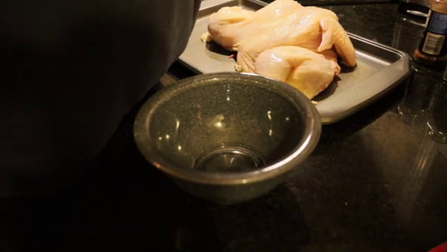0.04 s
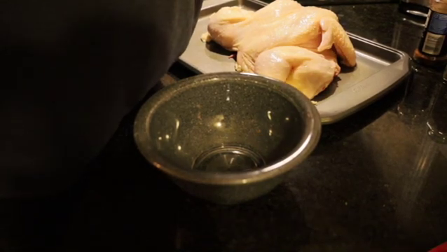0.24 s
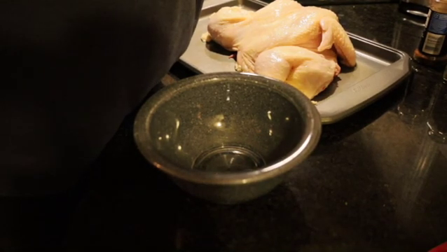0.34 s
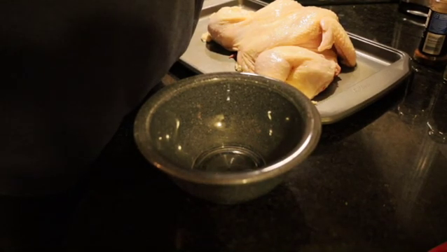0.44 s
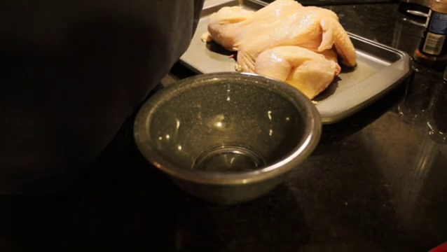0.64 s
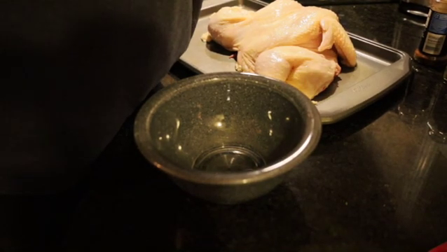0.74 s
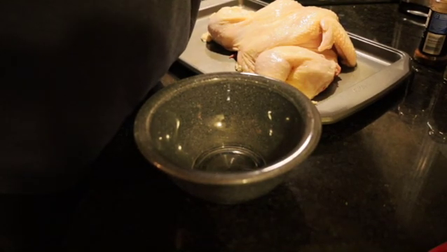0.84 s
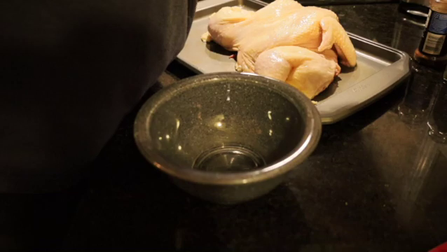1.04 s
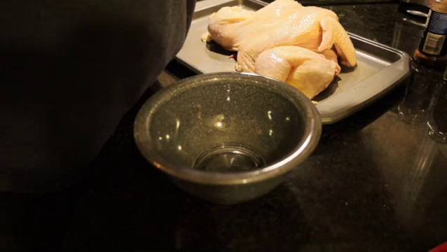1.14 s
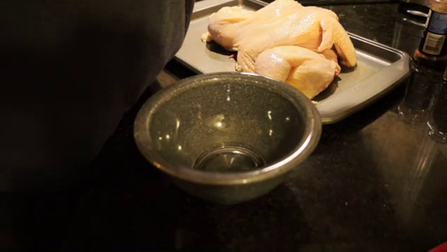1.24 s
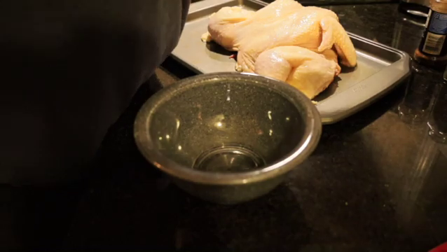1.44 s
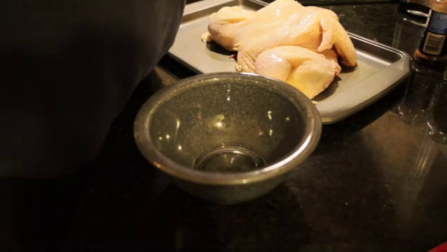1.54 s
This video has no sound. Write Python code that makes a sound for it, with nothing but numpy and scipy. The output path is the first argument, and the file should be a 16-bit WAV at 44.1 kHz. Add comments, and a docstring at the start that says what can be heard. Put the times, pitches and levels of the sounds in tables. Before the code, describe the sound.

Sugar crunching under a scoop in a small kitchen, with a sharp knock and faint taps.

```python
"""In a small kitchen, a scoop is pushed three times through brown sugar.
Grains crunch against it, lumps snap, and it squeaks faintly along the container's wall.
Early on it knocks hard, bounces and rings. A few light taps of handled utensils follow.
Soft bumps, a short room echo and quiet room air lie underneath."""
import sys
import numpy as np
from scipy import signal
from scipy.fft import rfft, irfft
from scipy.io import wavfile

SR = 44100
rng = np.random.default_rng(int(sys.argv[2]) if len(sys.argv) > 2 else 0)


def wav_record(signal):
    """Record a signal, one row per channel, as 16-bit PCM in the file named by sys.argv[1]."""
    frames = np.transpose(np.atleast_2d(signal))
    bounded = np.clip(frames, -1, 1)
    # unit amplitude maps onto the largest positive 16-bit level
    quanta = np.round(bounded * 32767).astype(np.int16)
    wavfile.write(sys.argv[1], SR, quanta)


N = 70560
T = np.arange(N) / SR

# three pushes through the sugar: time_s, crunch_db, hollow_db, fizz_db
FIRST_PUSH = [(.061, -67, -84, -96), (.069, -57, -55.5, -83), (.09, -50.5, -51, -58),
              (.108, -45.5, -54, -56), (.135, -52.5, -56, -60.5), (.15, -49.5, -67, -61.5),
              (.175, -50, -68, -65.5), (.192, -46.5, -57, -63), (.21, -50, -64, -63), (.23, -48, -54, -60)]
SECOND_PUSH = [(0.431, -67, -66.5, -92), (.468, -57, -74.5, -87), (.515, -42.5, -56.5, -59),
               (.533, -52, -63, -68), (.555, -57, -63, -84), (.58, -72, -78, -96)]
THIRD_PUSH = [(0.586, -75, -73, -99), (.632, -59, -75, -90), (0.652, -45, -50.5, -71),
              (.69, -49, -60, -70.5), (.755, -47.5, -62, -66), (.79, -48.5, -53.5, -55.5),
              (.86, -47, -64, -66), (.94, -54, -62, -67.5), (.985, -47.5, -60, -71),
              (1.025, -53.5, -66, -71), (1.053, -50, -60.5, -76), (1.129, -54, -70.5, -79),
              (1.165, -62, -71, -78.5), (1.205, -69.5, -70.5, -82), (1.225, -67.5, -73.5, -76.5),
              (1.273, -63, -63, -71), (1.305, -72.5, -89, -88)]
# how deep the scoop sits: time_s, depth_0_to_1
SCOOP_DEPTH = [(.2, 1), (.48, 0.53), (.62, 0.27), (.65, 1), (.71, 0.72), (.84, 0.46), (1.0, 0.35),
               (1.13, 0.9), (1.25, 1)]
# tone of the grains, from low to high: pitch_hz, level_db
DEEP_CRUNCH_TONE = [(900, -33.5), (1400, -11.5), (1950, 3), (2300, -2.5), (2800, -3), (3450, 4),
                    (4200, -2.5), (4800, -5), (6000, -9.5), (8000, -27.5), (11000, -58)]
SHALLOW_CRUNCH_TONE = [(900, -48.5), (1400, -23.5), (2000, -15.5), (2400, -2), (2800, -8), (3400, 3.5),
                       (4150, -5), (4700, -3.5), (6000, -17), (8000, -19.5), (11000, -62)]
HOLLOW_TONE = [(50, -12), (160, -11), (310, -1.5), (470, -6.5), (680, 1.5), (840, 5), (1020, -4),
               (1400, -8), (2500, -54.5)]
FIZZ_TONE = [(5000, -4.5), (8000, 4.5), (10000, -4.5), (13000, -3), (16000, -11)]
# lumps breaking: start_s, level_db, pitch_hz, length_s, crack_vs_snap_db
LUMP_SNAPS = [(0.065, -38, 3370, 0.0055, -33), (0.081, -32.5, 2154, 0.0011, -36),
              (0.101, -24, 2310, 0.0017, -18.5), (0.1423, -34, 3520, 0.0027, -25),
              (0.147, -36.5, 3620, 0.0032, -9), (0.184, -35.5, 3830, 0.01, -20),
              (0.257, -28, 6850, 0.0015, -24), (0.298, -33.5, 5960, 0.0034, -35),
              (0.307, -36, 6260, 0.0038, -27), (0.334, -42.5, 5800, 0.0035, -29),
              (0.498, -35, 3700, 0.0034, -17), (0.511, -34, 3940, 0.0011, -20),
              (0.592, -45.5, 3820, 0.0026, -45), (0.6376, -29, 3070, 0.00096, -38),
              (0.6457, -27, 2500, 0.0006, -40), (.6505, -33.5, 3200, 0.0028, -37),
              (0.6678, -34, 3230, 0.0013, -30), (0.7046, -28, 2660, 0.0019, -33),
              (0.8375, -29.5, 3580, 0.0022, -39), (0.847, -34, 3500, 0.0022, -34),
              (0.9165, -26, 3340, .0035, -15), (1.043, -38, 2250, 0.0075, -32),
              (1.069, -31.5, 4080, 0.0022, -28), (1.125, -42.5, 1870, 0.0074, -27)]
# tone around a snap's own pitch: pitch_ratio, level_db
LUMP_TONE = [(.1, -32), (.45, -25), (.75, -5.5), (1, 5), (1.25, -6.5), (1.9, -22), (3.2, -50)]
# the scoop knocks and bounces: start_s, level_db, thud_vs_clack_db, length_s
SCOOP_KNOCKS = [(0.2338, -10.5, 10, 0.0011), (0.236, -7, -0.5, 0.0068), (0.24, -12, -2.5, 0.0045),
                (0.245, 1.5, -15.5, 0.0038), (0.2501, -12, -0.5, 0.0033), (0.254, -7.5, -6.5, 0.0044),
                (0.2632, -3.5, 0, 0.017), (.273, -7, -1, 0.0072), (0.303, -18, -2, 0.0099)]
# tone of a lump's crack, a knock's clack and thud, and a tap's tick: pitch_hz, level_db
CRACK_TONE = [(2000, -33), (6000, -2), (8300, 7), (11500, -1.5), (15000, -8.5)]
CLACK_TONE = [(600, -29.5), (1300, -16.5), (2050, 5), (2500, -4), (3200, 3), (3800, -5.5), (4600, -7),
              (5300, -16), (7500, -19.5), (10000, -32.5), (15000, -37.5)]
THUD_TONE = [(50, -45), (110, -18), (300, -6.5), (600, -9), (860, 3), (1250, 3.5), (1650, 1.5), (2500, 1),
             (6000, -58)]
TICK_TONE = [(100, -35), (400, 4), (1200, -3.5), (3000, 12), (4500, -7), (7000, -26), (15000, -29)]
# notes that struck things ring with (ring_s is the time to fade by 60 dB): pitch_hz, level_db, ring_s
SCOOP_NOTES = [(841, -8, 0.2), (912, -6.5, 0.17), (1587, -9, 0.16), (1654, -2, 0.17), (1941, -7, .2),
               (2046, 6.5, 0.2), (2119, -3.5, 0.15), (2230, -8, 0.16), (2250, -10, .18), (2313, -3.5, .17),
               (2586, -3, 0.16), (3260, -10.5, 0.16), (4555, 3, 0.23)]
UTENSIL_NOTES = [(506, -17, 0.027), (950, -16, 0.035), (2135, -1, 0.033), (3280, 3.5, 0.0077),
                 (4110, -5, 0.018), (4470, -10, 0.018), (5430, -7.5, 0.023), (9700, -22.5, 0.0047),
                 (11400, -28, 0.011)]
# the scoop rubs the wall: start_s, length_s, level_db
WALL_RUBS = [(0.606, .03, -58), (0.883, 0.17, -57), (1.167, 0.013, -65), (1.213, 0.067, -55.5)]
# notes of the rubbed wall: pitch_hz, level_db
WALL_NOTES = [(2390, -2.5), (2640, -4.5), (3180, 3), (3320, 0.5), (3600, -3)]
# light taps: start_s, level_db, pitch_hz, ring_s, second_note_ratio, second_note_db, tick_db
LIGHT_TAPS = [(1.327, -57, 1150, 0.011, 1.6, -8, -12), (1.3526, -50.5, 1927, 0.037, 1.7, -13, -5),
              (1.3961, -55, 2470, 0.027, 1.55, -16, -15), (1.4264, -63.5, 4410, 0.012, 0.79, -1.5, -4),
              (1.4485, -60.5, 7450, 0.02, 1.1, -3.5, -12), (1.463, -64, 7550, 0.022, 0.87, -8, -15.5),
              (1.4698, -61.5, 1246, 0.023, 1.9, -2.5, -1)]
# a hard utensil clicks down: start_s, level_db
UTENSIL_CLICKS = [(1.5704, -59.5), (1.572, -42), (1.5736, -48.5), (1.578, -53)]
# soft bumps: peak_s, level_db, pitch_hz, rise_s, fall_s
SOFT_BUMPS = [(.164, -46.5, 745, .003, 0.0034), (.196, -41, 334, 0.0037, .0045),
              (.523, -52.5, 317, 0.0017, 0.0045), (0.9231, -42.5, 850, 0.0014, 0.0027),
              (1.356, -49.5, 358, 0.0018, .012), (1.358, -55.5, 600, 0.0029, .011),
              (1.4706, -48, 497, 0.0015, 0.0016)]
# how long the kitchen echoes: pitch_hz, ring_s
ECHO_TIMES = [(200, 0.37), (1400, 0.21), (3000, 0.32), (5600, 0.26)]
# tone of the room's air: pitch_hz, level_db
AIR_TONE = [(25, -38.5), (60, -23.5), (110, -11.5), (200, -3), (350, -2), (700, -11), (1500, -15.5),
            (3300, -19), (6000, -28), (15000, -42)]


def sugar(fade_s=0.0024):
    """Grains rub past the scoop: a crunch that darkens with depth, a hollow body and a fine fizz."""
    gains = np.zeros((3, N))
    for push in (FIRST_PUSH, SECOND_PUSH, THIRD_PUSH):
        times, *levels = np.transpose(push)
        fade = np.exp(-np.abs(T - np.clip(T, times[0], times[-1])) / fade_s)
        gains += fade * from_db([np.interp(T, times, level) for level in levels])
    crunch_gain, hollow_gain, fizz_gain = gains
    depth = np.interp(T, *np.transpose(SCOOP_DEPTH))
    clicks = crunch_gain * grains_and_crumbs(per_s=6500)
    crunch = colour(clicks * depth, DEEP_CRUNCH_TONE) + colour(clicks * (1 - depth), SHALLOW_CRUNCH_TONE)
    hollow = colour(hollow_gain * grains(per_s=1800), HOLLOW_TONE)
    fizz = colour(fizz_gain * grains_and_crumbs(per_s=4600), FIZZ_TONE)
    return crunch + from_db(-2.5) * hollow + from_db(-3.5) * fizz


def grains(per_s, spread_db=3, clump_db=1.6):
    """Grains click at random and in clumps, many small and a few large."""
    sizes = from_db(spread_db * np.minimum(rng.exponential(1, N), 3)) * rng.choice([-1, 1], N)
    clumps = from_db(clump_db * wander(per_s=150))
    return rms_one(clumps * sizes * (rng.random(N) < per_s / SR))


def grains_and_crumbs(per_s):
    """Among the fine grains, larger crumbs break, each ringing briefly on its own pitch."""
    pitches = np.geomspace(1200, 15000, 48)
    breaks = grains(per_s=1100)
    chosen = rng.integers(0, len(pitches), N)
    crumbs = sum(np.sqrt(hz) * ring(breaks * (chosen == k), hz, ring_s=0.019)
                 for k, hz in enumerate(pitches))
    return rms_one(grains(per_s) + from_db(-7) * rms_one(crumbs))


def lump_snaps(rise_share=0.56):
    """Each lump gives way in a short pitched snap with a fine crack on top."""
    out = 0
    for start, db, hz, length, crack_db in LUMP_SNAPS:
        burst = contact(start, length) * fade_in(start, rise_share * length)
        snap = peak_one(colour(burst, [(hz * ratio, level) for ratio, level in LUMP_TONE]))
        crack = from_db(crack_db) * peak_one(colour(burst, CRACK_TONE))
        out += from_db(db - 3) * (snap + crack)
    return out


def scoop_knocks():
    """The scoop hits and bounces; each hit is a hard clack and a lower thud."""
    clack = sum(from_db(db - 1) * contact(start, length) for start, db, _, length in SCOOP_KNOCKS)
    thud = sum(from_db(db + thud_db - 3) * contact(start, length)
               for start, db, thud_db, length in SCOOP_KNOCKS)
    return colour(clack, CLACK_TONE) + colour(thud, THUD_TONE)


def scoop_ring(twin_gap_hz=21):
    """The first touch rings softly; the hardest hit stops that and starts a ring that swells and dies."""
    first_s = SCOOP_KNOCKS[0][0]
    hardest_s = max(SCOOP_KNOCKS, key=lambda row: row[1])[0]
    swell = fade_in(hardest_s, rise_s=0.0093)
    out = 0
    for start, gain in ((first_s, from_db(-10) * (1 - swell)), (hardest_s, swell)):
        strike = signal.unit_impulse(N, int(start * SR))
        for k, (hz, db, ring_s) in enumerate(SCOOP_NOTES):
            twin = from_db(-15) * ring(strike, hz + twin_gap_hz, ring_s)  # makes the note wobble
            out += (-1) ** k * gain * from_db(db) * (ring(strike, hz, ring_s) - twin)
    return from_db(-28.5) * out


def wall_squeak(release_s=0.0066):
    """The scoop rubs along the wall in tiny slips that set the wall's notes ringing."""
    gain = 0
    for start, length, db in WALL_RUBS:
        fade_out = np.exp(-np.maximum(T - start - length, 0) / release_s)
        gain += from_db(db) * fade_in(start, rise_s=0.006) * fade_out
    slips = grains(per_s=1500)
    squeak = sum((-1) ** k * from_db(db) * ring(slips, hz, ring_s=0.021)
                 for k, (hz, db) in enumerate(WALL_NOTES))
    return gain * rms_one(squeak)


def edge_rasp(start_s=1.08, end_s=1.13):
    """As the scoop comes out, grains skid on its edge with one thin, high note."""
    progress = np.clip((T - start_s) / (end_s - start_s), 0, 1)
    swell = np.sqrt(np.abs(np.sin(np.pi * progress)))
    return from_db(-64) * swell * rms_one(ring(grains(per_s=4600), hz=6930, ring_s=0.01))


def utensil_taps(soften_hz=9000):
    """Each light tap is a soft tick and two notes that die quickly."""
    out = 0
    for start, db, hz, ring_s, ratio, second_db, tick_db in LIGHT_TAPS:
        touch = contact(start, length_s=0.00067)
        note = peak_one(ring(touch, hz, ring_s))
        second_note = from_db(second_db) * peak_one(ring(touch, hz * ratio, ring_s))
        tick = from_db(tick_db) * peak_one(colour(touch, TICK_TONE))
        out += from_db(db) * (note + second_note + tick)
    return signal.sosfilt(signal.butter(4, soften_hz, fs=SR, output="sos"), out)


def utensil_click():
    """A hard utensil lands in a quick run of hits that ring short, hollow notes."""
    hits = sum(from_db(db) * signal.unit_impulse(N, int(start * SR)) for start, db in UTENSIL_CLICKS)
    return sum((-1) ** k * from_db(db) * ring(hits, hz, ring_s)
               for k, (hz, db, ring_s) in enumerate(UTENSIL_NOTES))


def soft_bumps(waver_radians=0.5):
    """A cushioned push swells one low, unsteady note, which dies quickly."""
    out = 0
    for peak_s, db, hz, rise_s, fall_s in SOFT_BUMPS:
        swell = np.exp(-np.maximum(peak_s - T, 0) / rise_s - np.maximum(T - peak_s, 0) / fall_s)
        phase = 2 * np.pi * hz * (T - peak_s) + waver_radians * wander(per_s=260)
        out += from_db(db) * swell * np.sin(phase)
    return out


def kitchen(x, echo_db, build_s=0.0016):
    """Add the room's echo: it builds fast, and each band of pitches dies at its own rate."""
    edges_hz = np.geomspace(60, 16000, 9)
    noise = rng.standard_normal((2, N))
    echo = 0
    for k, (low, high) in enumerate(zip(edges_hz, edges_hz[1:])):
        band = signal.sosfilt(signal.butter(2, [low, high], "band", fs=SR, output="sos"), noise[k % 2])
        echo += band * np.exp(-np.log(1000) * T / at_hz(ECHO_TIMES, np.sqrt(low * high)))
    echo *= 1 - np.exp(-(T / build_s) ** 2)
    return x + from_db(echo_db) * signal.fftconvolve(x, echo / np.linalg.norm(echo))[:N]


def room_air():
    """The room's air is a steady, low hush."""
    return from_db(-72.5) * colour(rng.standard_normal(N), AIR_TONE)


def contact(start_s, length_s, size=4096):
    """A gritty touch: a dying burst of tiny clicks, about equally strong at every pitch."""
    age = np.arange(size) / SR
    burst = rng.standard_normal(size) * np.exp(-age / length_s)
    for _ in range(4):  # even out the tone, then make the burst short again
        spectrum = rfft(burst)
        burst = irfft(spectrum / (np.abs(spectrum) + 1e-12)) * np.exp(-(age / (4 * length_s)) ** 2)
    return np.concatenate([np.zeros(int(start_s * SR)), burst / np.linalg.norm(burst), np.zeros(N)])[:N]


def ring(x, hz, ring_s):
    """Every click in x starts a pure note that fades away."""
    decay = np.exp(-np.log(1000) / (ring_s * SR))
    step = 2 * np.pi * hz / SR
    return signal.lfilter([0, np.sin(step)], [1, -2 * decay * np.cos(step), decay ** 2], x + 1e-18)


def colour(x, tone, size=4096):
    """Give x the balance of low and high pitches in a tone table."""
    cepstrum = irfft(np.log(from_db(at_hz(tone, np.fft.rfftfreq(size, 1 / SR)))))
    cepstrum[1:size // 2] *= 2
    cepstrum[size // 2 + 1:] = 0  # so nothing sounds before the click that causes it
    response = irfft(np.exp(rfft(cepstrum)))
    return signal.fftconvolve(x, response / np.linalg.norm(response))[:N]


def at_hz(table, hz):
    """Read a table between its pitches, with octaves evenly spaced."""
    pitches, values = np.transpose(table)
    return np.interp(np.log(np.maximum(hz, 1)), np.log(pitches), values)


def fade_in(start_s, rise_s):
    """Rise smoothly from 0 towards 1."""
    return 1 - np.exp(-np.maximum(T - start_s, 0) / rise_s)


def wander(per_s):
    """Drift to a new random value per_s times a second."""
    return np.interp(T * per_s, np.arange(N), rng.standard_normal(N))


def from_db(db):
    """Turn decibels into a number to multiply by."""
    return 10 ** (np.asarray(db) / 20)


def rms_one(x):
    """Scale to an average strength (rms) of 1."""
    return x / np.sqrt(np.mean(x ** 2) + 1e-20)


def peak_one(x):
    """Scale to a peak of 1."""
    return x / (np.abs(x).max() + 1e-20)


def scene():
    """Scooping, knocking and handling in the kitchen, over the room's air."""
    air = room_air()
    scooping = kitchen(sugar() + lump_snaps() + wall_squeak() + edge_rasp(), echo_db=-13.5)
    knocking = kitchen(scoop_knocks(), echo_db=-6) + scoop_ring()
    handling = kitchen(utensil_taps() + utensil_click() + soft_bumps(), echo_db=-15)
    return (scooping + knocking + handling + air)[None]


def record(dry):
    """The microphone thins the bass; the highest treble is cut steeply."""
    low_cut_hz, high_cut_hz = 125, 15800
    thin = signal.sosfilt(signal.butter(3, low_cut_hz, "high", fs=SR, output="sos"), dry)
    return signal.sosfilt(signal.ellip(12, .1, 80, high_cut_hz, fs=SR, output="sos"), thin)


dry = scene()
out = record(dry)
wav_record(out)
```